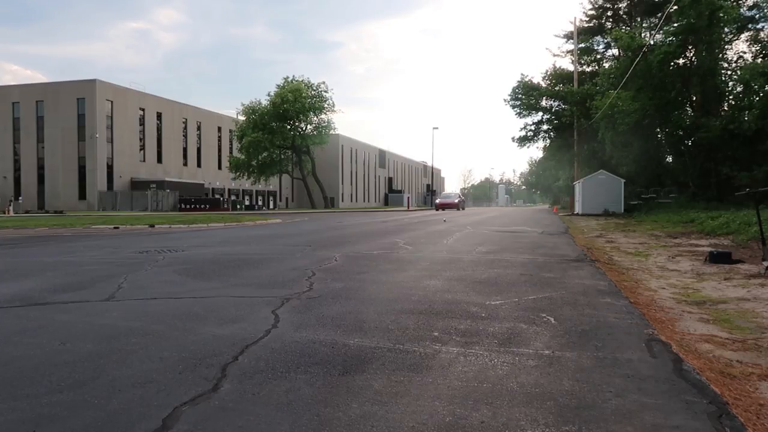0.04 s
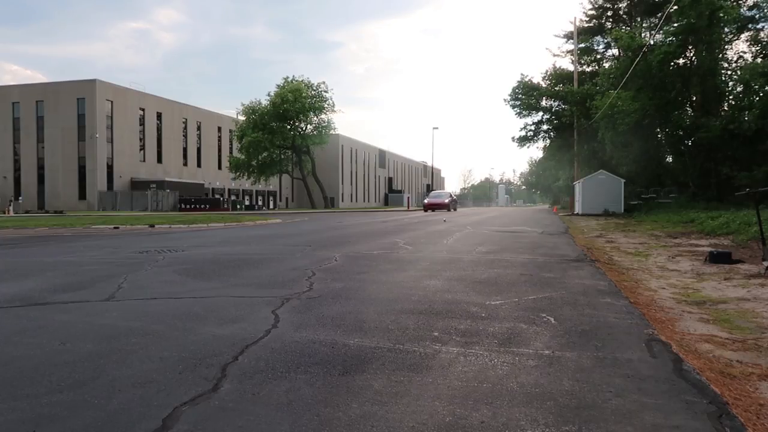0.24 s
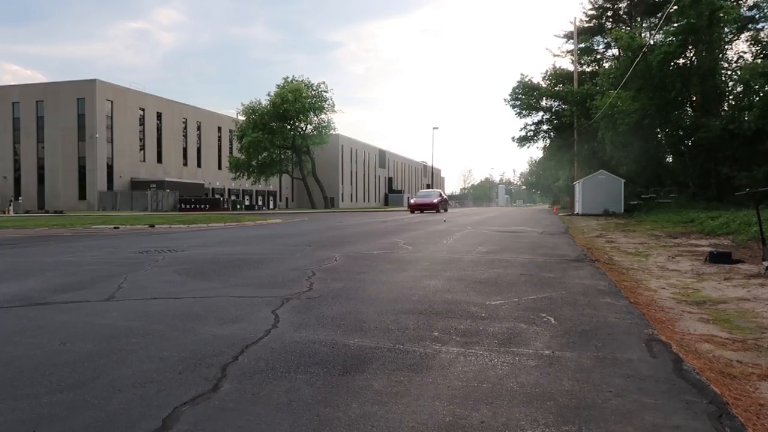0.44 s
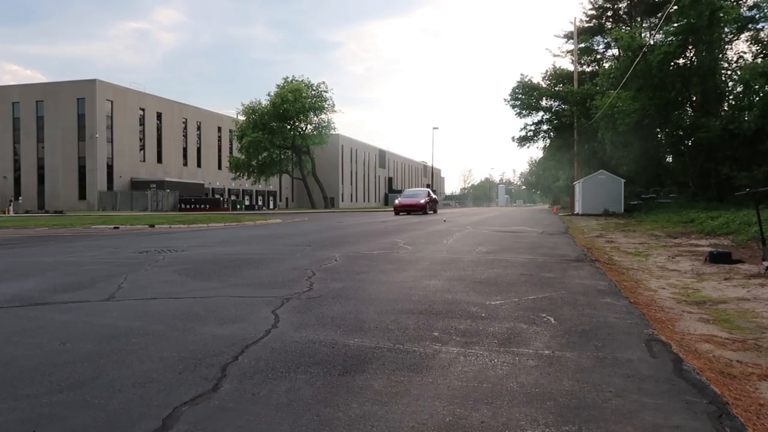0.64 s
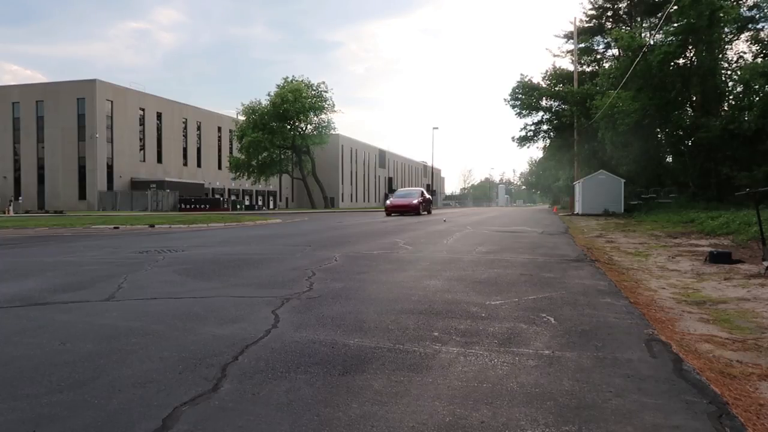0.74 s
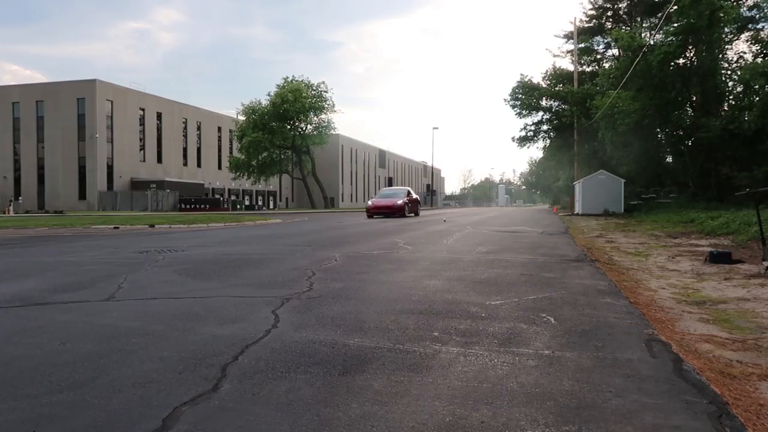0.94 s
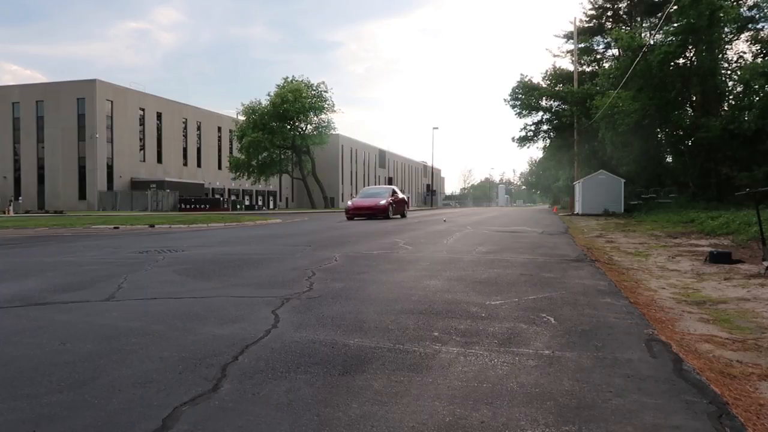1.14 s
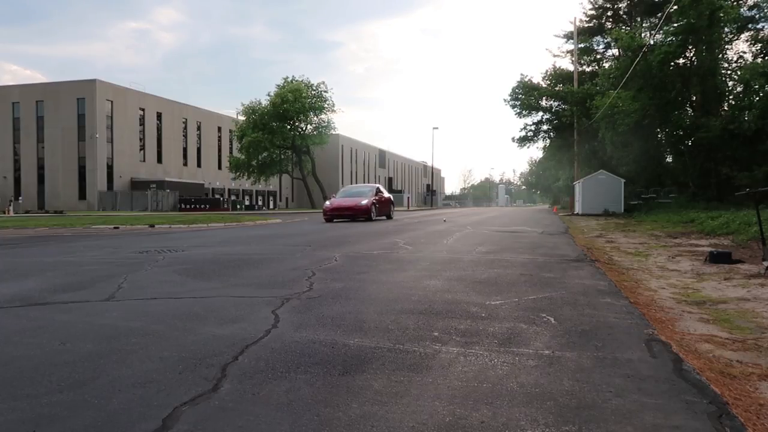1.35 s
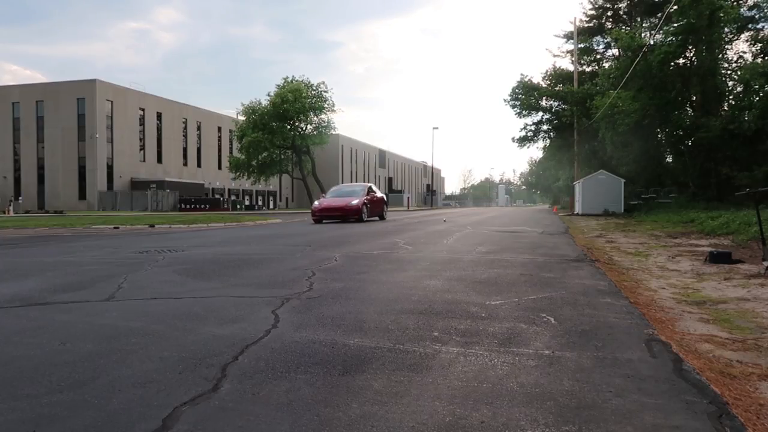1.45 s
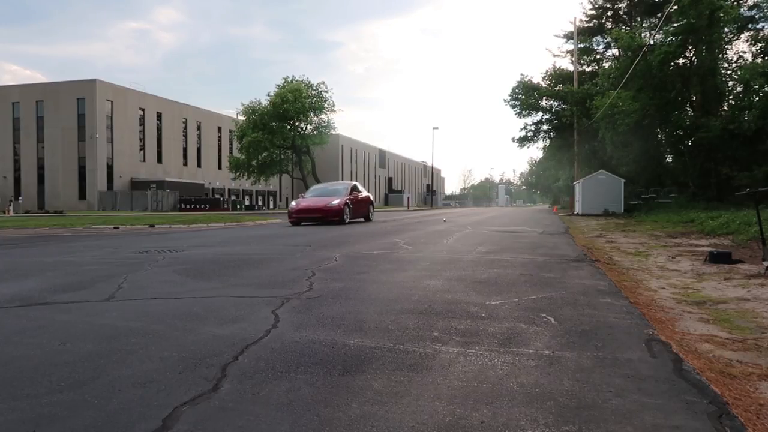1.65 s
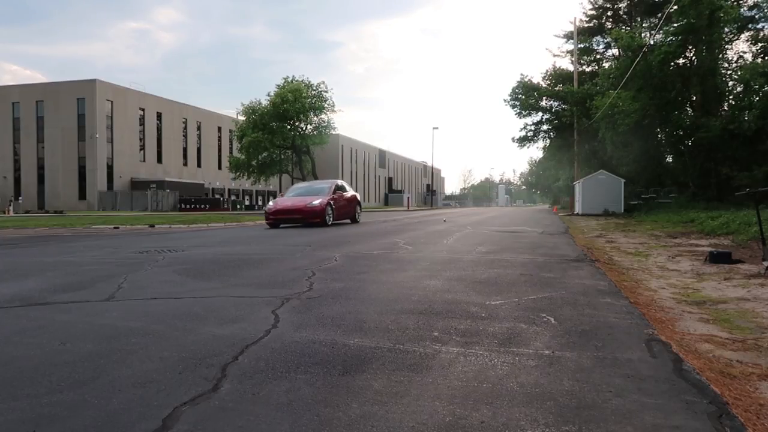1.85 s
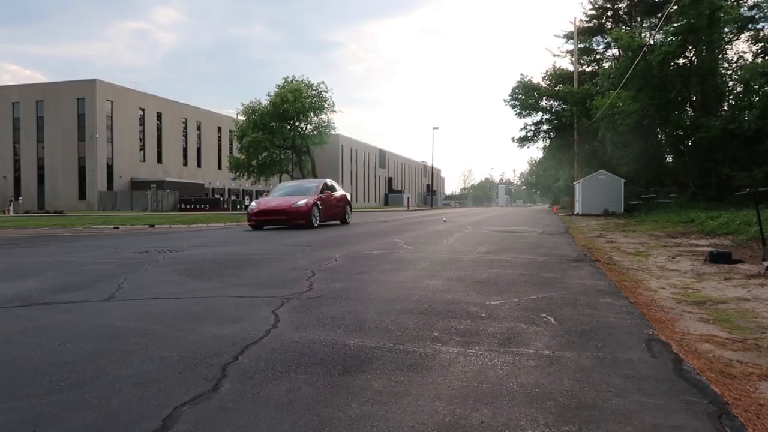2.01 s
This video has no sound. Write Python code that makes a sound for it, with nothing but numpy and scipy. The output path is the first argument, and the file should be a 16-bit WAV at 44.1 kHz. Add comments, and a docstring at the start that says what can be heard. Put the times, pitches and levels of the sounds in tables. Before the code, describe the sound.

Tyre squeal of a braking car on open asphalt. Until about 0.4 s only faint low rolling and tiny chirps; at 0.55 s a dull knock, then a wavering squeal near 1050 Hz surges unevenly, with rasp and gritty scrubbing. It is strongest and steadiest around 1.25-1.45 s, then breaks into separate bursts near 1.55, 1.75, 1.9 and 2.04 s. Weak scattered echo, nearly centred.

```python
"""An asphalt road with a building beside it: a car brakes hard as it comes towards the microphone.
The tread of one tyre sticks and slips about 1050 times a second and squeals in surges, a wavering tone
with overtones; the other tyres sing along more raggedly, with a high rasp, brief chirps and one knock.
Rubber scrubs over the grit as coloured noise, the tyres rumble as low noise, and the building throws
back a weak, scattered echo."""
import sys
import numpy as np
from scipy import signal
from scipy.fft import rfft, irfft, dct
from scipy.io import wavfile

SR = 44100
rng = np.random.default_rng(int(sys.argv[2]) if len(sys.argv) > 2 else 0)


def log_audio(samples):
    """Write samples as a 16-bit WAV file to the path given in sys.argv[1]."""
    # one column per channel
    frames = np.atleast_2d(samples).T
    # limit to full scale, then quantise
    limited = np.clip(frames, -1, 1)
    pcm = np.round(limited * 32767).astype(np.int16)
    wavfile.write(sys.argv[1], SR, pcm)


N = 91595
TIME_S = np.arange(N) / SR
FREQ_HZ = np.fft.rfftfreq(N, 1 / SR)


def undb(db):
    """Decibels to gain."""
    return 10 ** (np.asarray(db) / 20)


def curve(table, col):
    """One column of a table joined by straight lines in time."""
    rows = np.array(table, float)
    return np.interp(TIME_S, rows[:, 0], rows[:, col])


def colour(points):
    """Gain at each frequency from (Hz, dB) points, joined on a log pitch scale."""
    rows = np.array(points, float)
    gain_db = np.interp(np.log(FREQ_HZ + 1), np.log(rows[:, 0]), rows[:, 1])
    return undb(gain_db)


def bump(centre_hz, width_hz):
    """Bell-shaped gain, 1 at its centre."""
    return np.exp(-((FREQ_HZ - centre_hz) / width_hz) ** 2)


def noise(gain):
    """Noise of rms 1 with the given gain at each frequency."""
    x = irfft(rfft(rng.standard_normal(N)) * gain, N)
    return x / x.std()


def walk(rate_hz):
    """Smooth random motion of spread 1; a higher rate moves faster."""
    return noise(np.exp(-.5 * (FREQ_HZ / rate_hz) ** 2))


def turn(hz):
    """Phase of an oscillator that follows a pitch."""
    return 2 * np.pi * np.cumsum(hz) / SR


def filtered(x, gain):
    """A sound with the given gain at each frequency."""
    spectrum = dct(x, norm="ortho")
    # the cosine spectrum has two bins for each gain
    return dct(spectrum * np.repeat(gain, 2)[:N], type=3, norm="ortho")


RIPPLE_HZ, RIPPLE_SHARE = 760, .5  # notch spacing, strength of the reflection


def ripple():
    """A close reflection cuts evenly spaced notches into the treble."""
    share = RIPPLE_SHARE * np.clip(FREQ_HZ / 1500 - 1, 0, 1)
    return np.abs(1 - share * np.exp(2j * np.pi * FREQ_HZ / RIPPLE_HZ))


SLIP_START_S, SLIP_RISE_S = .47, 0.1


def slip():
    """How far the skid has set in, 0-1."""
    return np.clip((TIME_S - SLIP_START_S) / SLIP_RISE_S, 0, 1)


SCRUB_TRIM_DB, GRIT_DB = -1, 1.9  # level trim, spread of the grainy flutter
BRIGHTEN_DB_PER_S, BRIGHTEN_HZ = 11.5, 4700  # the air swallows less treble as the car nears
SCUFF_S, SCUFF_LENGTH_S, SCUFF_LIFT_DB = 0.103, .014, 7.5  # a brief scuff before the skid
# rubber sliding over grit, before the trim: start_s [s], level_db [dB]
SCRUB_LEVEL = [(0.0, -60), (0.3, -60.5), (0.56, -50), (0.61, -42.5), (0.64, -49), (0.82, -38.5),
               (0.87, -48.5), (0.93, -47), (1.01, -42.5), (1.09, -48.5), (1.14, -40), (1.21, -50.5),
               (1.25, -43.5), (1.38, -48), (1.39, -42.5), (1.51, -49.5), (1.59, -46.5), (1.7, -50),
               (1.76, -44.5), (2.01, -57), (2.04, -48.5), (2.07, -61.5)]
# tone of the friction hiss: freq_hz [Hz], gain_db [dB]
SCRUB_TONE = [(300, 4), (600, 6.5), (850, 7), (1400, 13.5), (1750, -0.5), (2500, 2), (3100, 2),
              (4500, -7.5), (7000, -23), (10000, -33.5), (12500, -36.5), (14000, -48.5)]
# resonances of the hiss: pitch_hz [Hz], width_hz [Hz], lift_db [dB]
SCRUB_RESONANCES = [(1050, 69, 5), (1540, 80, 9.4), (2080, 54, 2.4), (3440, 63, 2.7), (4720, 80, 3),
                    (6000, 290, 3)]


def scrub():
    """Gritty friction noise through fixed resonances, brighter as the car nears."""
    lift_db = sum(db * bump(hz, width) for hz, width, db in SCRUB_RESONANCES)
    gain = ripple() * colour(SCRUB_TONE) * undb(lift_db)
    # the level is set by the part above 2800 Hz
    treble_share = np.sqrt(np.sum(gain[FREQ_HZ > 2800] ** 2) / np.sum(gain ** 2))
    hiss = noise(gain) / treble_share
    treble = filtered(hiss, FREQ_HZ ** 4 / (FREQ_HZ ** 4 + BRIGHTEN_HZ ** 4))
    brighten_db = BRIGHTEN_DB_PER_S * (TIME_S - TIME_S.mean())
    hiss = hiss + treble * (undb(brighten_db) - 1)
    scuff_db = SCUFF_LIFT_DB * np.exp(-((TIME_S - SCUFF_S) / SCUFF_LENGTH_S) ** 2)
    grit_db = GRIT_DB * walk(rate_hz=560)
    return hiss * undb(curve(SCRUB_LEVEL, 1) + SCRUB_TRIM_DB + scuff_db + grit_db)


TREAD_DB, SING_DB, DRONE_TRIM_DB = -42, -50, -1.5
# rolling tyres: start_s [s], rumble_db [dB], casing drone_db before the trim [dB]
ROLLING_LEVEL = [(0.0, -48.5, -43.5), (0.58, -44, -44.5), (0.71, -38, -38), (1.03, -42.5, -43.5),
                 (1.15, -35.5, -33.5), (1.22, -39.5, -40), (1.46, -40.5, -41), (1.95, -32.5, -38),
                 (2.01, -44.5, -49), (2.08, -36.5, -36)]
# tone of the low rumble: freq_hz [Hz], gain_db [dB]
RUMBLE_TONE = [(20, -26), (35, -11.5), (55, -1.5), (80, 2.5), (120, -0.5), (170, -4), (300, -53),
               (2000, -120)]
# tone of the casing drone: freq_hz [Hz], gain_db [dB]
DRONE_TONE = [(90, -14.5), (150, -4), (220, 7), (320, 0.5), (400, -18), (500, -1.5), (750, -29),
              (4000, -120)]
# tread noise of the approaching car: freq_hz [Hz], gain_db [dB]
TREAD_TONE = [(210, -35.5), (350, 1), (400, -13), (614, -2.5), (838, -6.5), (876, 0.5), (1080, -1),
              (1210, -14.5), (1970, -10), (2190, -22), (4390, -34), (5320, -38.5), (14000, -70)]


def rolling():
    """Low rumble, casing drone, and the hiss and faint singing of the tread, all shaped noise."""
    rumble = noise(colour(RUMBLE_TONE)) * undb(curve(ROLLING_LEVEL, 1))
    drone = noise(colour(DRONE_TONE)) * undb(curve(ROLLING_LEVEL, 2) + DRONE_TRIM_DB)
    tread = noise(colour(TREAD_TONE) * ripple()) * undb(TREAD_DB + walk(rate_hz=57))
    sing = noise(bump(1050, 80)) * undb(SING_DB + 4.2 * walk(rate_hz=15))
    return rumble + drone + tread + sing


CHIRP_JITTER_HZ = 30
# faint first chirps, then chirps of a higher tread mode:
# centre_s [s], length_s [s], pitch_hz [Hz], level_db at the top of the swell [dB]
CHIRP_EVENTS = [(.005, 0.019, 964, -35), (0.109, 0.043, 1044, -41.5), (0.745, 0.032, 1229, -27.5),
                (0.97, 0.023, 1341, -34.5), (1.114, 0.061, 1250, -32), (1.577, 0.0099, 1220, -35),
                (1.751, 0.025, 1274, -22), (1.811, 0.081, 1229, -37)]


def chirps():
    """A tread mode swells and dies for a moment."""
    out = 0
    for centre_s, length_s, pitch_hz, level_db in CHIRP_EVENTS:
        swell = np.exp(-2 * ((TIME_S - centre_s) / length_s) ** 2)
        phase = turn(pitch_hz + CHIRP_JITTER_HZ * walk(rate_hz=120))
        out = out + undb(level_db) * swell * np.sqrt(2) * np.sin(phase)
    return out


SQUEAL_START_S, SQUEAL_TRIM_DB = .38, -1
WOBBLE_HZ, JITTER_HZ = 2.9, 9.34  # slower and faster pitch wander
FULL_DB, OVERTONE_GROWTH = -45, .3  # harder scrubbing gives richer overtones (dB per dB)
GRIP_HZ, OVERTONE_DB_PER_HZ = 1052.5, .5  # above this pitch the tread slides lighter and purer
OVERTONE_FLICKER_DB, OVERTONE_ROUGH_RAD = 2.2, .35  # each slip smears the overtones
BLOCK_HZ, BLOCK_SPREAD_HZ, BLOCK_DEPTH = 142, 46, 0.053  # tread blocks meeting the road pulse the squeal
# a firm squeal holds steady, a weak one stutters
FLUTTER_DB, STUTTER_DB, FIRM_DB, LOOSE_DB = 1.7, 3, -10.5, -18.5
# squeal of the leading tyre: start_s [s], level_db before the trim [dB], stick-slip pitch_hz [Hz]
SQUEAL_PATH = [(0.388, -41, 1067), (0.395, -30.5, 1067), (0.406, -41, 1053), (0.495, -42, 1075),
               (0.52, -32, 1090), (0.566, -30, 1060), (0.573, -20, 1073), (0.613, -15, 1053),
               (0.635, -23, 1090), (0.655, -24, 1065), (0.7, -18.5, 1022), (0.735, -12, 1052),
               (0.803, -13.5, 1036), (0.826, -8.5, 1006), (0.865, -22, 1016), (0.91, -19, 1058),
               (0.945, -20.5, 1062), (0.965, -12.5, 1062), (1.0, -10.5, 1045), (1.02, -19, 1039),
               (1.095, -26, 1069), (1.139, -23, 1045), (1.147, -10.5, 1028), (1.172, -13, 1035),
               (1.193, -25, 1080), (1.208, -17.5, 1068), (1.245, -18, 1090), (1.263, -10.5, 1083),
               (1.318, -7.5, 1046), (1.345, -10.5, 1062), (1.372, -10.5, 1036), (1.388, -8.5, 1058),
               (1.412, -8.5, 1055), (1.423, -20, 1042), (1.431, -12, 1055), (1.457, -10, 1053),
               (1.47, -16, 1058), (1.5, -18, 1052), (1.525, -16.5, 1085), (1.539, -23, 1072),
               (1.546, -10.5, 1042), (1.583, -11, 1040), (1.61, -30, 1080), (1.622, -20, 1012),
               (1.65, -33, 1050), (1.679, -33, 1095), (1.688, -21, 1085), (1.735, -14, 1084),
               (1.768, -8.5, 1050), (1.798, -36, 1063), (1.808, -20.5, 1102), (1.85, -21, 1095),
               (1.863, -27, 1050), (1.872, -8.5, 1030), (1.897, -9, 1054), (1.915, -34, 1060),
               (1.95, -28, 1075), (1.98, -47.5, 1083), (2.022, -33, 1108), (2.038, -10, 1114),
               (2.05, -35.5, 1107), (2.075, -35, 1101)]
# overtones at full scrub: multiple of the pitch, level_db against the fundamental [dB]
SQUEAL_OVERTONES = [(2, -22), (3, -41.5), (4, -49)]


def leading_tyre():
    """Stick-slip tone, richest under hard scrubbing; it stutters when weak, and tread blocks add side tones."""
    level_db, pitch_hz = curve(SQUEAL_PATH, 1), curve(SQUEAL_PATH, 2)
    wander_hz = WOBBLE_HZ * walk(rate_hz=38.3) + JITTER_HZ * walk(rate_hz=102.3)
    phase = turn(pitch_hz + wander_hz)
    rich_db = OVERTONE_GROWTH * (curve(SCRUB_LEVEL, 1) - FULL_DB)
    rich_db = rich_db - OVERTONE_DB_PER_HZ * np.maximum(pitch_hz - GRIP_HZ, 0)
    tone = np.sin(phase)
    for multiple, overtone_db in SQUEAL_OVERTONES:
        smear = OVERTONE_ROUGH_RAD * walk(rate_hz=180)
        flicker_db = OVERTONE_FLICKER_DB * walk(rate_hz=30)
        # a whole multiple keeps the overtone locked to the slips
        overtone = np.sin(round(multiple) * phase + smear)
        tone = tone + undb(overtone_db + rich_db + flicker_db) * overtone
    blocks = 1 + BLOCK_DEPTH * noise(bump(BLOCK_HZ, BLOCK_SPREAD_HZ))
    depth_db = np.interp(level_db, [LOOSE_DB, FIRM_DB], [STUTTER_DB, FLUTTER_DB])
    flutter_db = depth_db * np.minimum(walk(rate_hz=50), 1)  # dips go deeper than peaks
    sliding = np.clip((TIME_S - SQUEAL_START_S) / 0.015, 0, 1)
    return np.sqrt(2) * tone * blocks * sliding * undb(level_db + SQUEAL_TRIM_DB + flutter_db)


OTHER_WOBBLE_HZ, OTHER_JITTER_HZ, OTHER_FLUTTER_DB, OTHER_OCTAVE_DB = 15.42, 20.4, 4.5, -22
LOCK_FROM_DB, LOCK_DUCK = -9, 0.59  # a strong squeal crowds out the ragged tones (dB per dB)
# ragged squeal of the other tyres: pitch_hz [Hz], level_db of the peak above the scrub curve [dB]
RAGGED_TONES = [(1015, 18), (1094, 19)]


def other_tyres():
    """Unsteady tones that follow the scrub and beat against each other."""
    out = 0
    for pitch_hz, level_db in RAGGED_TONES:
        wander_hz = OTHER_WOBBLE_HZ * walk(rate_hz=25) + OTHER_JITTER_HZ * walk(rate_hz=114)
        phase = turn(pitch_hz + wander_hz)
        tone = np.sin(phase) + undb(OTHER_OCTAVE_DB) * np.sin(2 * phase)
        out = out + tone * undb(level_db + OTHER_FLUTTER_DB * walk(rate_hz=46))
    duck_db = LOCK_DUCK * np.maximum(curve(SQUEAL_PATH, 1) - LOCK_FROM_DB, 0)
    return out * slip() * undb(curve(SCRUB_LEVEL, 1) - duck_db)


RASP_HZ, RASP_SPREAD_HZ, RASP_TRIM_DB = 2322, 130, -2.5
# rasp about an octave above the squeal: start_s [s], level_db before the trim [dB]
RASP_LEVEL = [(0.53, -57.5), (0.595, -34.5), (0.65, -49.5), (0.725, -38), (0.814, -27), (0.865, -52.5),
              (1.012, -29), (1.08, -56), (1.124, -29.5), (1.19, -59), (1.216, -38), (1.422, -35.5),
              (1.5, -47), (1.596, -39.5), (1.64, -54), (1.762, -34.5), (1.79, -54), (1.88, -37),
              (1.99, -66.5), (2.038, -27.5), (2.07, -65)]


def rasp():
    """A high tread mode that never settles on one pitch."""
    tone = np.sqrt(2) * np.sin(turn(RASP_HZ + RASP_SPREAD_HZ * walk(rate_hz=170)))
    flutter_db = 2.5 * walk(rate_hz=100)
    return tone * slip() * undb(curve(RASP_LEVEL, 1) + RASP_TRIM_DB + flutter_db)


KNOCK_S, KNOCK_RISE_S, TICK_DB = .5502, 0.0011, -43.5
# rings of the knock: pitch_hz [Hz], level_db of the peak [dB]
KNOCK_RINGS = [(600, -19), (790, -25.5)]


def knock():
    """One compact thump with a sharp tick as the brakes bite."""
    age_s = np.maximum(TIME_S - KNOCK_S, 0)
    rise = age_s / KNOCK_RISE_S
    rings = sum(undb(db) * np.sin(2 * np.pi * hz * age_s) for hz, db in KNOCK_RINGS)
    thump = rise * np.exp(1 - rise) * rings
    tick = noise(1 / (1 + (FREQ_HZ / 3000) ** 2)) * (age_s > 0) * np.exp(-rise)
    return thump + undb(TICK_DB) * tick


ECHO_DB, ECHO_T60_S, ECHO_DELAY_S = -20, 0.05, 0.1


def echo(x):
    """Scattered, fading reflections from the building and the trees, as a decaying noise tail."""
    fade = np.exp(-np.log(1000) * TIME_S / ECHO_T60_S)
    tail = rng.standard_normal(N) * (TIME_S > ECHO_DELAY_S) * fade
    return undb(ECHO_DB) * signal.fftconvolve(x, tail / np.linalg.norm(tail))[:N]


# stereo spread: freq_hz [Hz], side_db against the middle [dB]
STEREO_WIDTH = [(60, -29), (670, -28.5), (1230, -23), (2250, -19), (4110, -15.5), (7510, -6),
                (13700, -11.5)]


def scene():
    """The car is almost straight ahead; mostly the treble spreads, from fresh draws of the noise."""
    squeal = leading_tyre() + other_tyres() + rasp() + chirps() + knock()
    mid = squeal + echo(squeal) + scrub() + rolling()
    spread = scrub() + rolling() + other_tyres() + rasp() + echo(squeal)
    side = filtered(spread, colour(STEREO_WIDTH))
    return np.array([mid + side, mid - side])


TOP_HZ = 14000


def record(dry):
    """A steep low-pass cuts the top."""
    low_pass = signal.ellip(8, .2, 70, TOP_HZ, fs=SR, output="sos")
    return signal.sosfilt(low_pass, dry)


dry = scene()
out = record(dry)
log_audio(out)
```